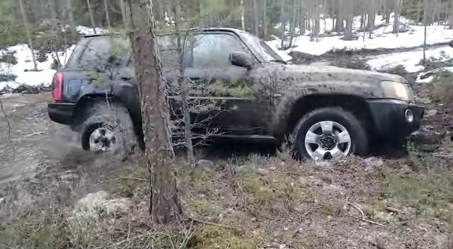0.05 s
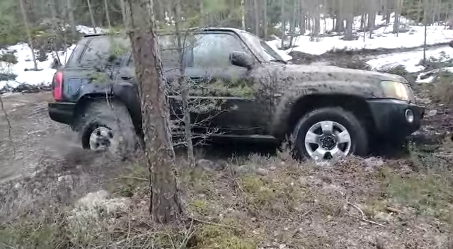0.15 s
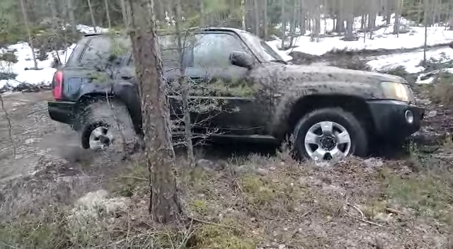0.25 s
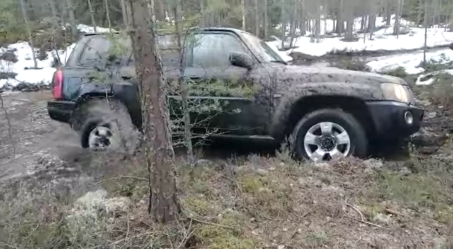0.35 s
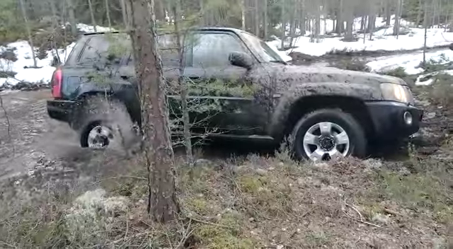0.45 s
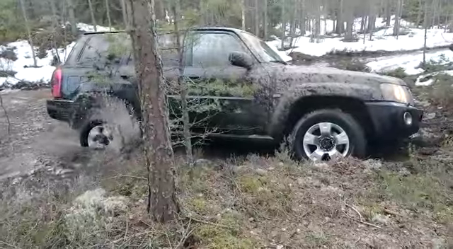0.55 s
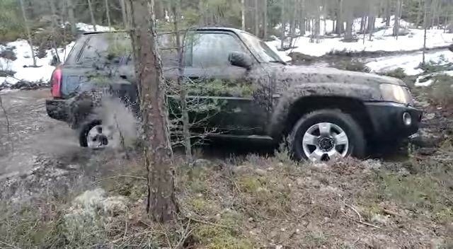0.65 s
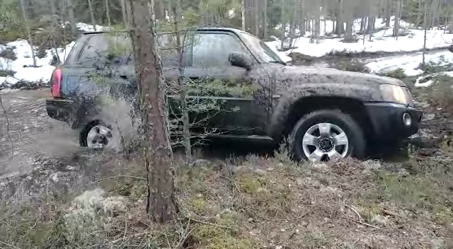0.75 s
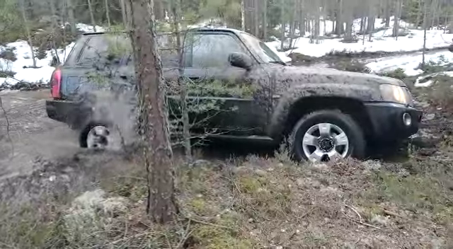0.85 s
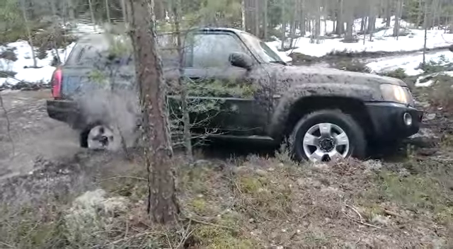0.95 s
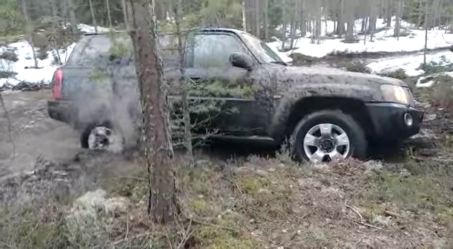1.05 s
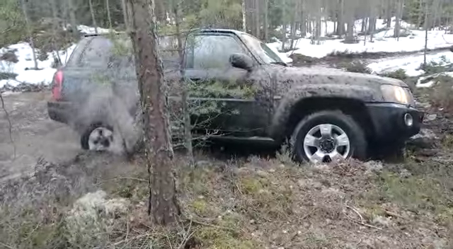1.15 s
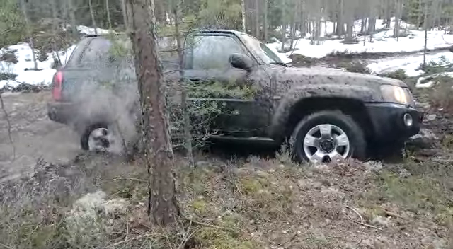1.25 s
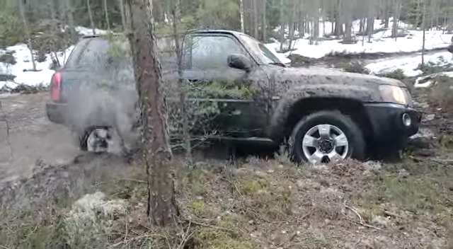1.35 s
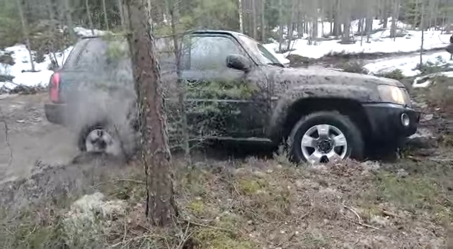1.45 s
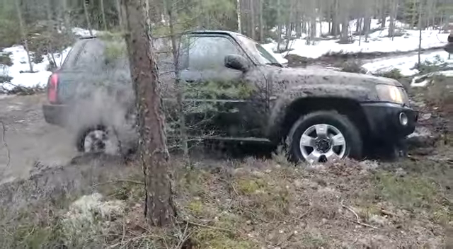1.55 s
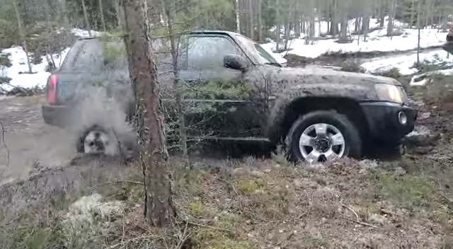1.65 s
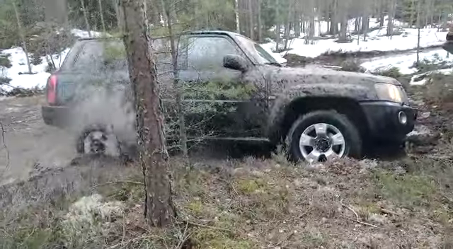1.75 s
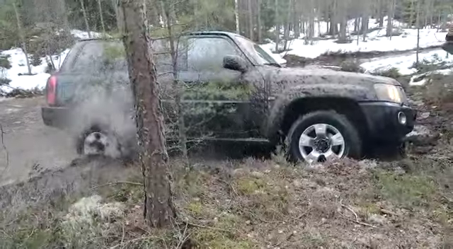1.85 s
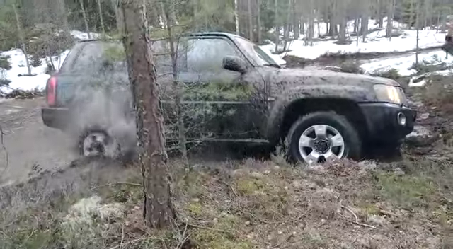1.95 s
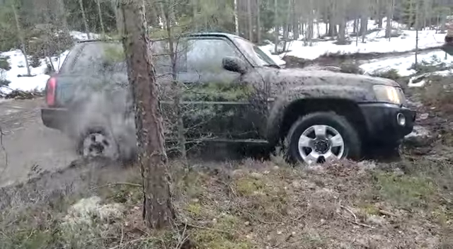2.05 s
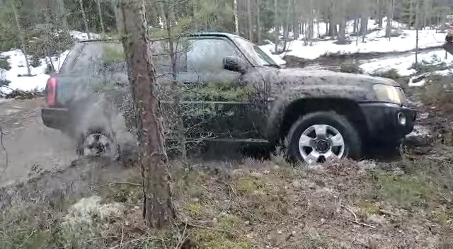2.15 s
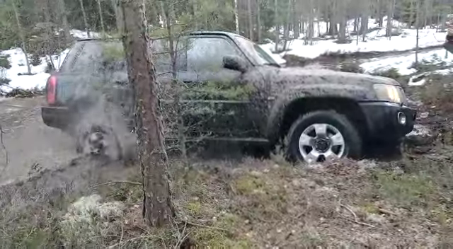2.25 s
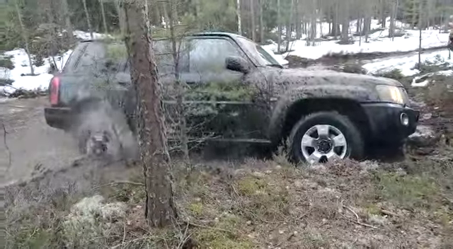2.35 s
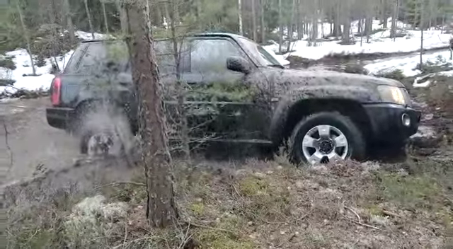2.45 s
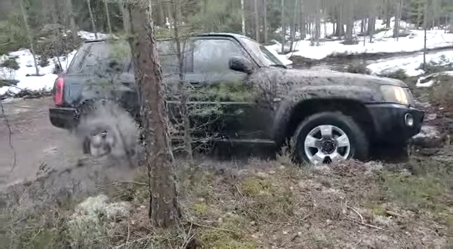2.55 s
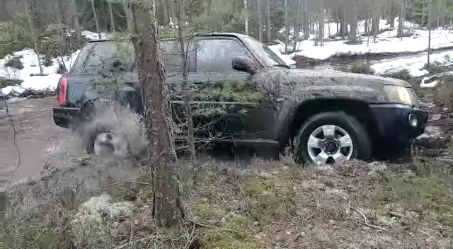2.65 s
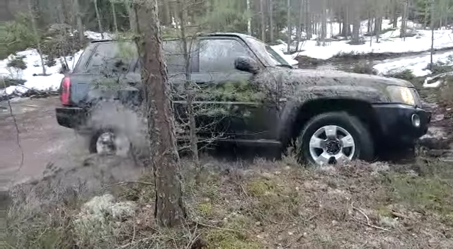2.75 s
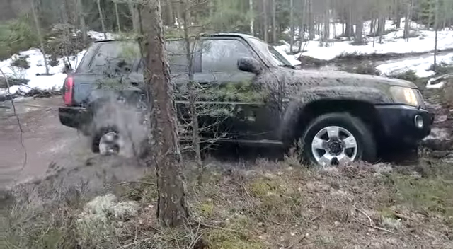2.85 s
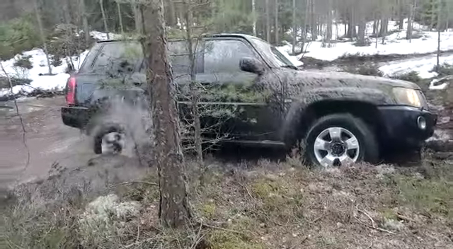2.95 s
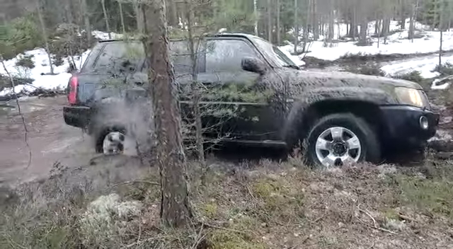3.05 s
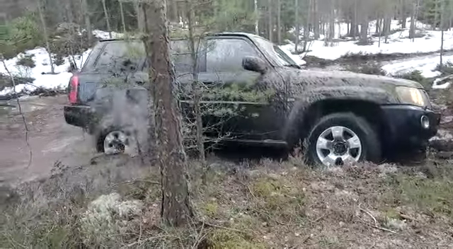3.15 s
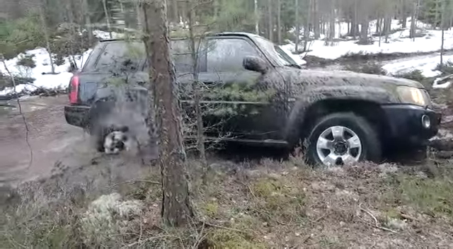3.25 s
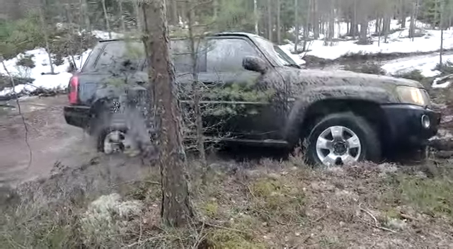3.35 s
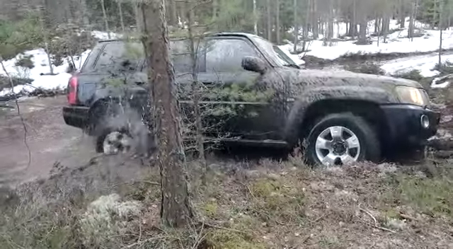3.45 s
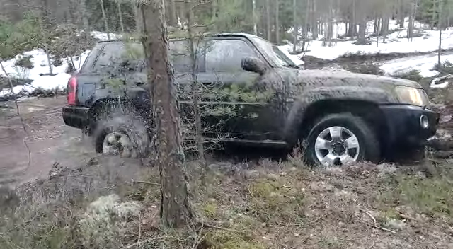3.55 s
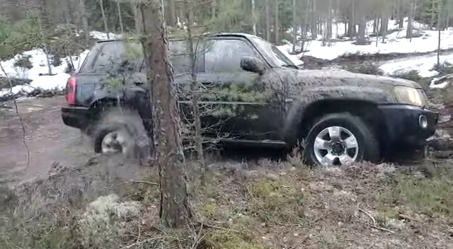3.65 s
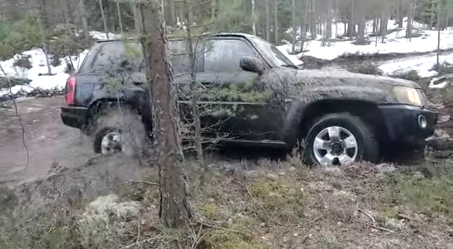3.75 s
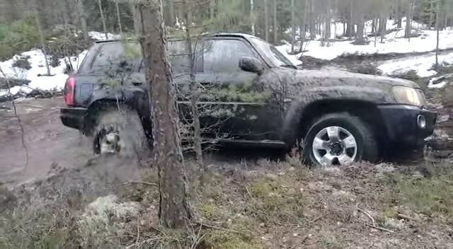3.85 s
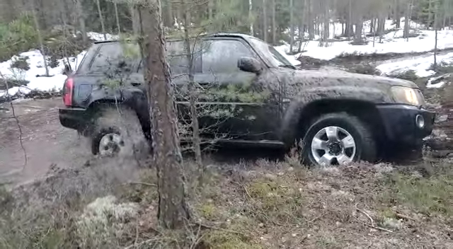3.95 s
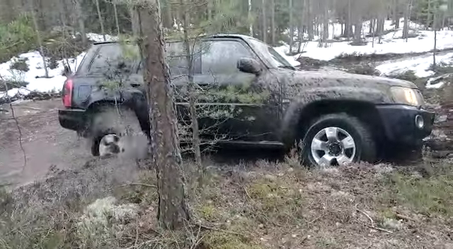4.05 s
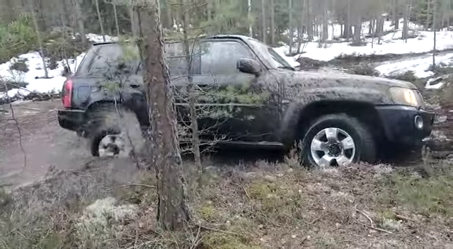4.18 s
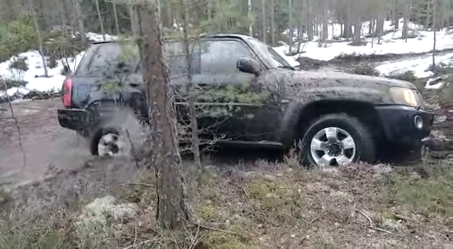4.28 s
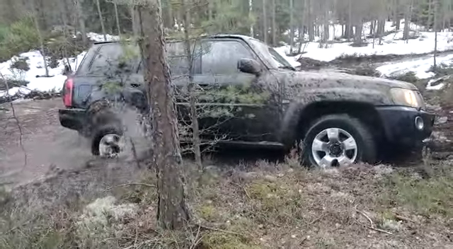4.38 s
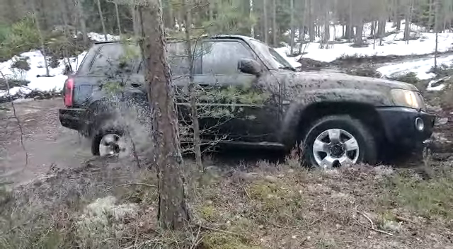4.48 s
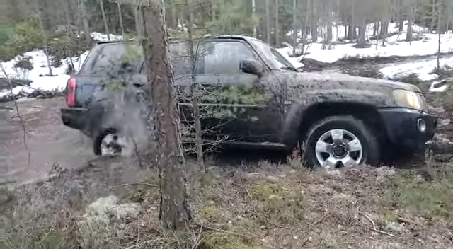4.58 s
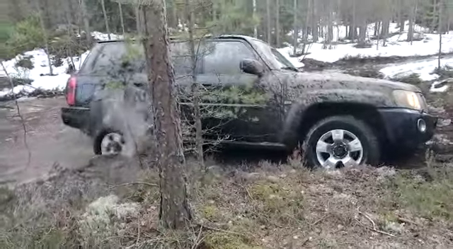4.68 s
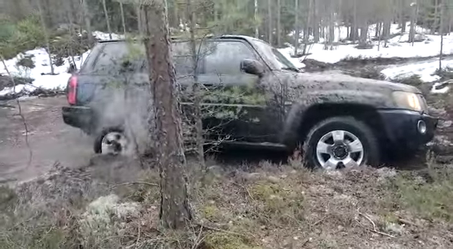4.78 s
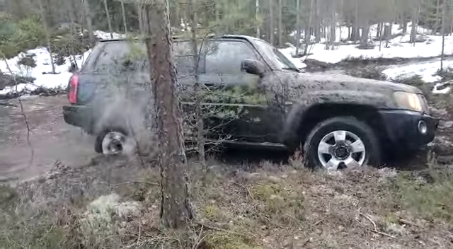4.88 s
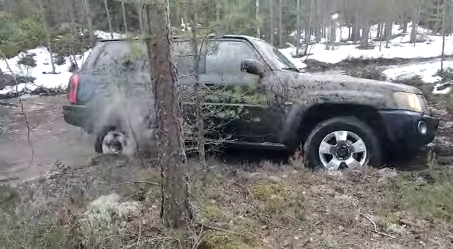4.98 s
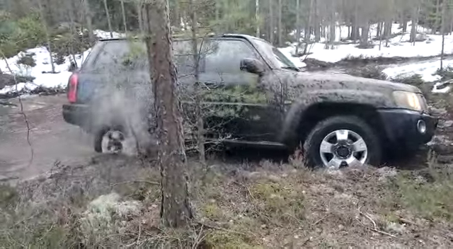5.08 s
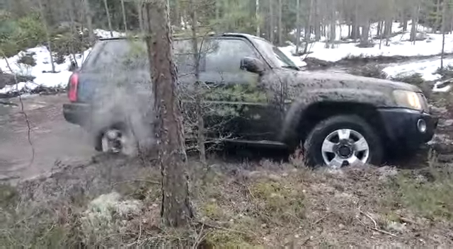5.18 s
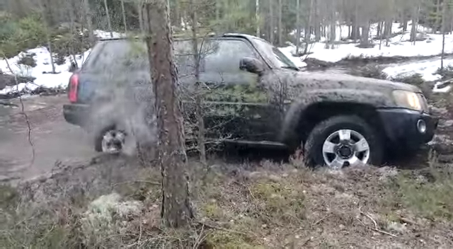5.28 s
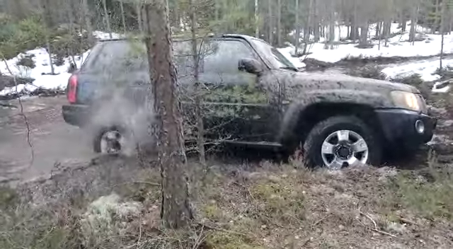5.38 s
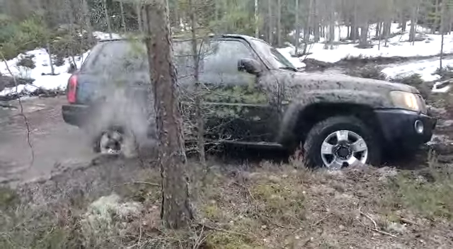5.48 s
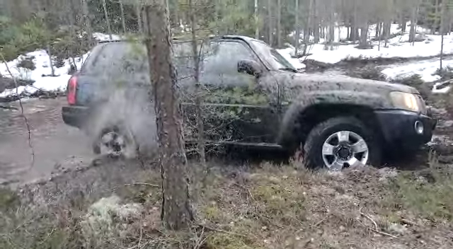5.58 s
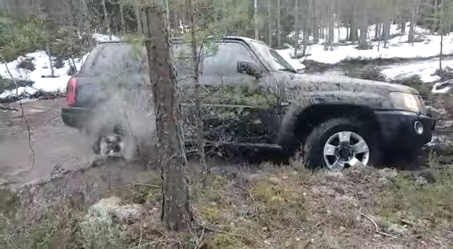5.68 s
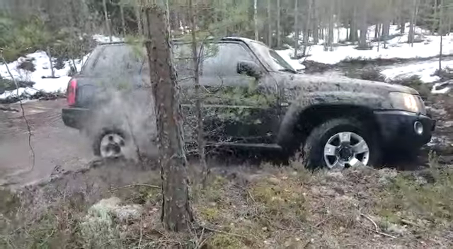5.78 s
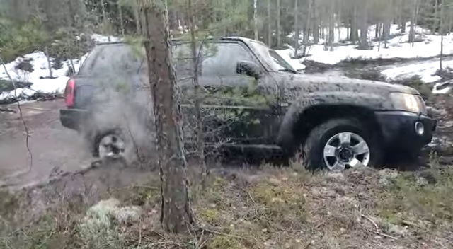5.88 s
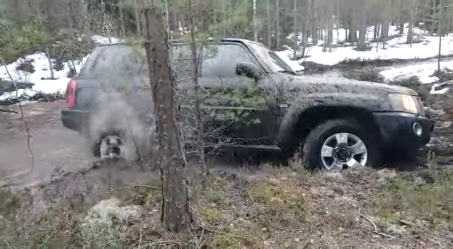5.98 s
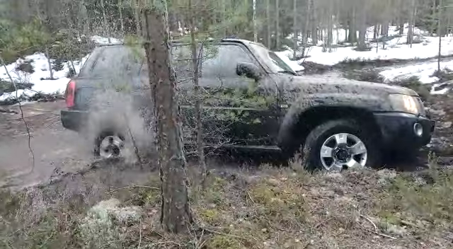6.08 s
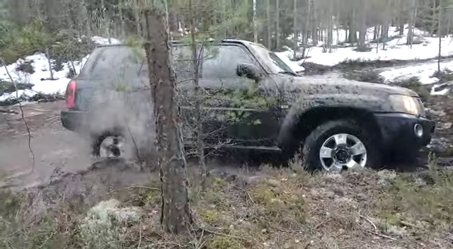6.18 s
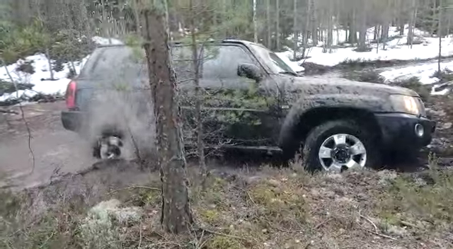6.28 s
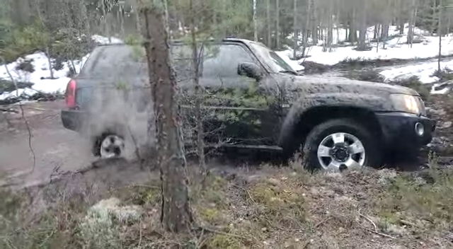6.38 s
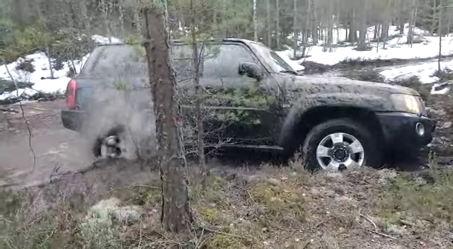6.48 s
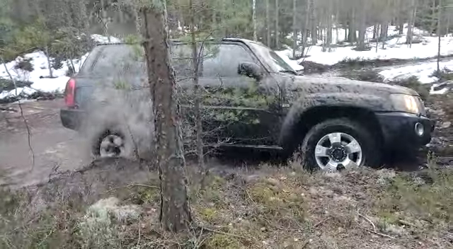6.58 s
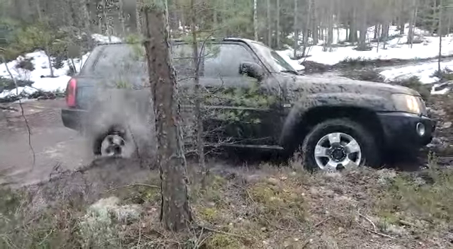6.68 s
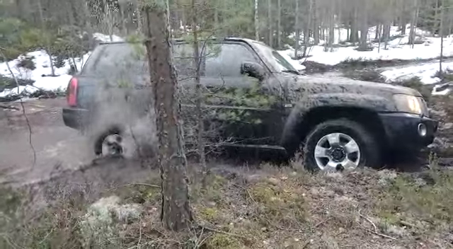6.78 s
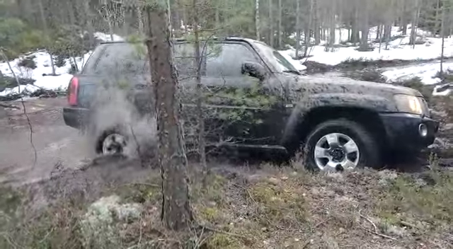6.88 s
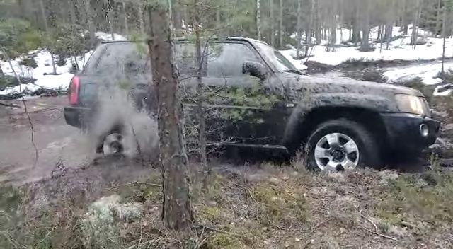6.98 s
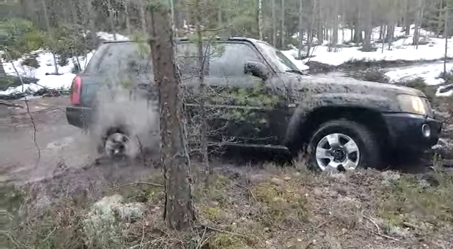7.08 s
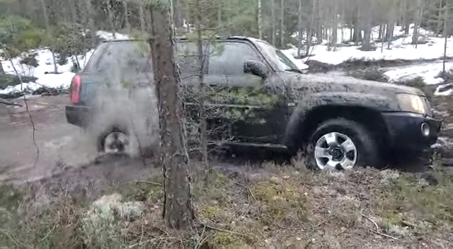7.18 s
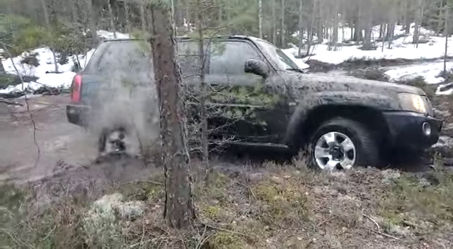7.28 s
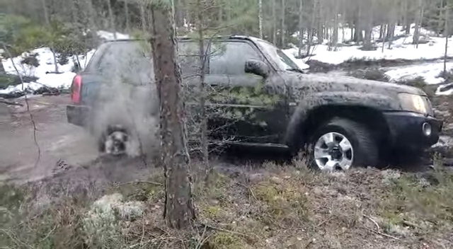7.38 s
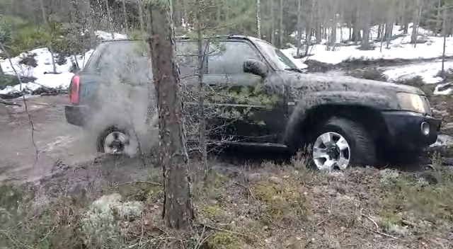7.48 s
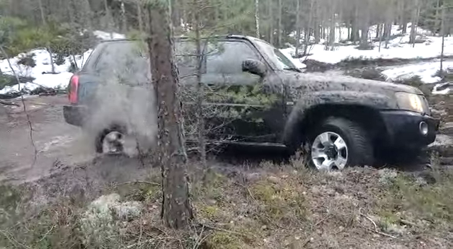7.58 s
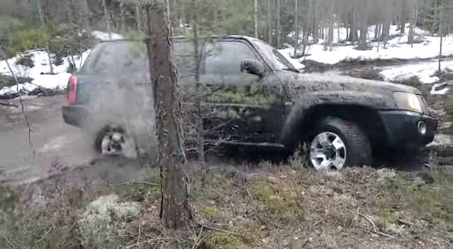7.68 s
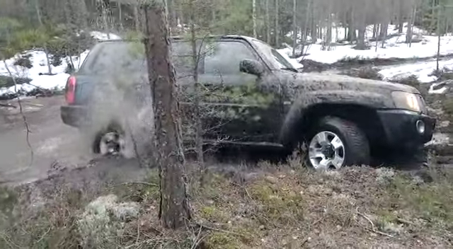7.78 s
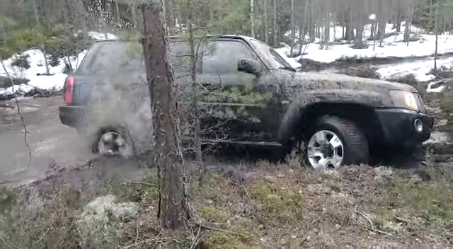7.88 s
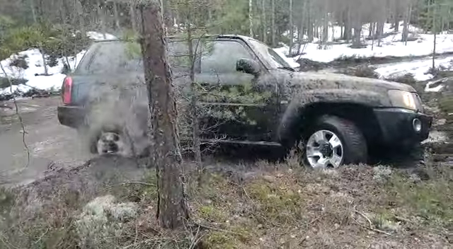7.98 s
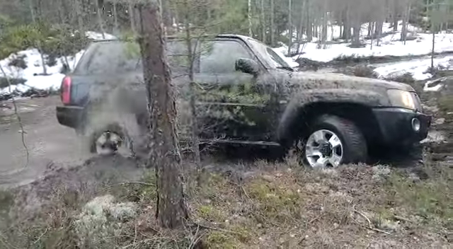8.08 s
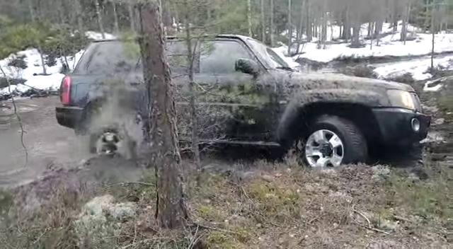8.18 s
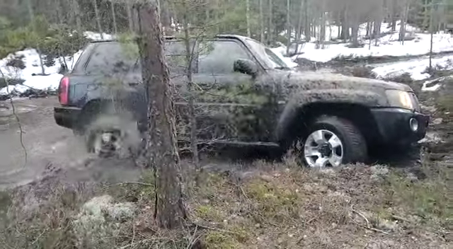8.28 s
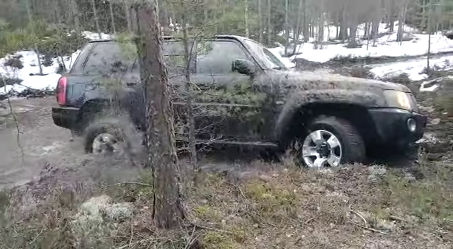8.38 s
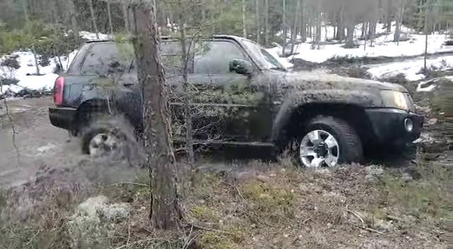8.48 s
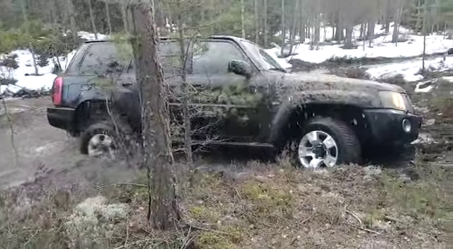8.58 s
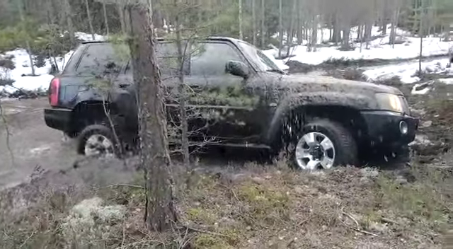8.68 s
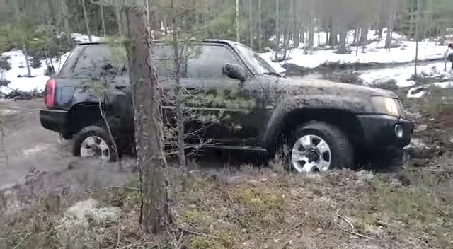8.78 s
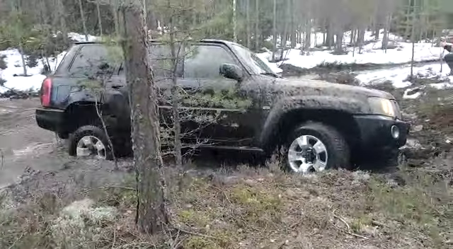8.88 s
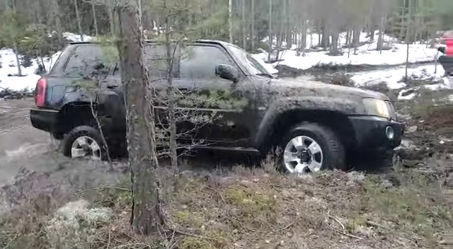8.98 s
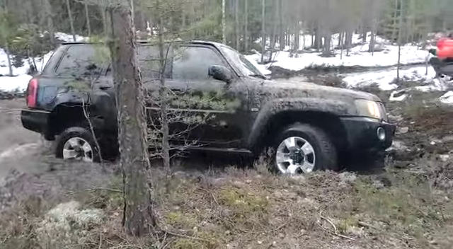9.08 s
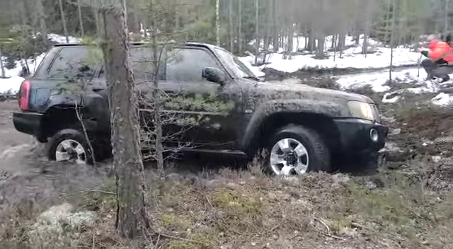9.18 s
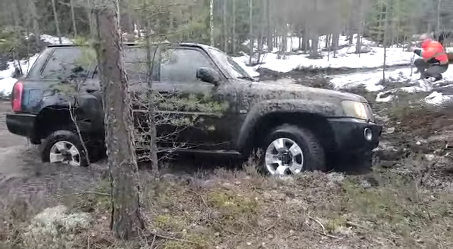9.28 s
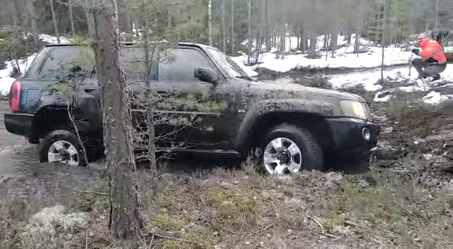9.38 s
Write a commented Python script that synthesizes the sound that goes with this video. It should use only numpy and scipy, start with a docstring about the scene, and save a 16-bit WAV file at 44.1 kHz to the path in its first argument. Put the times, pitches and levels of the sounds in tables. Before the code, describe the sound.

A heavy diesel engine is already revving and rises into a full, rough roar; broad wet hiss from a spinning wheel swells with it. The sound dips, rises briefly, dips lower, then builds into a long sustained surge with gear whine and muddy splatter. Near the end it falls quickly, leaving soft idle clatter, lumps of mud ticking and a small falling whine. Open-air, mono, with dull treble limit and quiet low background.

```python
"""A four-cylinder diesel off-roader, stuck in mud, revs in long surges and drops to idle, heard by one microphone.
Engine: random firing puffs and noise through a pipe spectrum, crank-multiple sines, clatter noise, decaying thuds.
A faster geared shaft sings in sines near full speed; a spinning tyre roars, hisses and throws mud and water in
patchy noise and sharp drops. A thin sine whines twice; below lie rumble, hum and wind. The end leaves idle clatter,
a short whine and sharp ticks in noise bursts: mud lumps at first, then ticks of the idling engine."""
import sys
import numpy as np
from scipy import signal
from scipy.fft import rfft, irfft, next_fast_len
from scipy.io import wavfile
from scipy.ndimage import uniform_filter1d, map_coordinates

SR = 44100
rng = np.random.default_rng(int(sys.argv[2]) if len(sys.argv) > 2 else 0)


def log_audio(samples):
    """Write samples as a 16-bit WAV file to the path given in sys.argv[1]."""
    # one column per channel
    frames = np.atleast_2d(samples).T
    # limit to full scale, then quantise
    limited = np.clip(frames, -1, 1)
    pcm = np.round(limited * 32767).astype(np.int16)
    wavfile.write(sys.argv[1], SR, pcm)


N = 416304
TIME = np.arange(N) / SR


def amp(db):
    """Amplitude factor of a level in dB."""
    return 10 ** (np.asarray(db) / 20)


def unit(x):
    """x scaled to rms 1."""
    return x / np.sqrt(np.mean(x ** 2) + 1e-20)


def curves(rows):
    """One value per sample for each column after the time."""
    t_s, *columns = np.transpose(rows)
    return [np.interp(TIME, t_s, column) for column in columns]


def along(points, hz):
    """(f/Hz, level/dB) points read on a log frequency axis."""
    f_hz, level_db = np.transpose(points)
    return np.interp(np.log(hz + 1), np.log(f_hz + 1), level_db)


def wobble(rate_hz):
    """Smooth random curve, rate_hz knots per second."""
    knots = rng.standard_normal(int(N * rate_hz / SR) + 4)
    return map_coordinates(knots, [TIME * rate_hz])


def filtered(x, response):
    """x times a response of frequency, zero-padded against wrap-around."""
    m = next_fast_len(N + SR // 2)
    spectrum = rfft(x, m) * response(np.fft.rfftfreq(m, 1 / SR))
    return irfft(spectrum, m)[..., :N]


def coloured(x, points):
    """x through a (f/Hz, level/dB) spectrum, at rms 1."""
    return unit(filtered(x, lambda hz: amp(along(points, hz))))


def patchy(patchy_db):
    """Noise with time-frequency patches of random gain, patchy_db rms; 0 leaves it even."""
    z = signal.stft(rng.standard_normal(N), nperseg=512)[2]
    field = uniform_filter1d(rng.standard_normal(z.shape), 6, 0)
    field = uniform_filter1d(field, 8, 1)
    return signal.istft(z * amp(patchy_db * unit(field)), nperseg=512)[1][:N]


def drops():
    """Dense sharp impacts of uneven size, at rms 1."""
    hit = rng.random(N) < .02
    return unit(hit * amp(3 * rng.standard_normal(N)) * rng.standard_normal(N))


def tone(turns, waver_db, drift_rad):
    """Sine on a running count of turns, rms 1 before its random waver in level; its phase drifts."""
    level = np.sqrt(2) * amp(waver_db * wobble(7))
    return level * np.sin(2 * np.pi * (turns + rng.random()) + drift_rad * wobble(9))


def fade(rows, edge_s):
    """1 inside the time span of a table, with linear ramps at its ends."""
    return np.clip(np.minimum(TIME - rows[0][0], rows[-1][0] - TIME) / edge_s, 0, 1)


# crank speed: t/s, speed/(turns/s)
REVS = [(0, 30), (0.5, 38), (1.18, 46.5), (1.85, 45.6), (2.02, 42.6), (2.36, 38.8), (2.68, 38.2),
        (2.95, 41.3), (3.1, 39.5), (3.36, 27.5), (3.52, 26), (4.29, 36.6), (4.68, 42.7), (5.05, 45.8),
        (5.3, 44.7), (6.25, 46.8), (6.54, 46.4), (6.8, 44), (7.07, 45.9), (7.7, 45.8), (7.97, 41.7),
        (8.44, 24.4), (8.82, 13), (9.0, 12.3)]
# engine: t/s, exhaust level/dB, 7th crank multiple level/dB
ENGINE = [(0, -20, -24.5), (.5, -19.5, -26), (.9, -18, -28.5), (1.3, -16.5, -29.5), (1.8, -17.5, -33.5),
          (2.05, -18, -22.5), (2.35, -23, -24), (2.7, -19.5, -37), (2.95, -17.5, -26.5), (3.45, -22.5, -50),
          (3.9, -21, -30.5), (4.3, -18, -28), (4.9, -18, -27), (5.5, -17, -34), (6, -16, -28),
          (6.6, -18, -36.5), (7.75, -17, -33), (8.15, -21.5, -31), (8.45, -28, -37.5), (8.7, -36, -46)]
# exhaust boom at high, then low speed: f/Hz, relative density/dB
PIPE_FAST = [(29, -54.5), (50, -26), (82, -11), (149, -7), (172, -1), (227, 2.5), (291, 0), (324, -6),
             (356, -4), (388, -7.5), (497, -20.5), (650, -28.5), (840, -39.5), (1430, -120)]
PIPE_SLOW = [(38, -46), (65, -20), (76, -21), (152, 1), (325, -10.5), (390, -19), (460, -23.5), (650, -41),
             (840, -54.5), (1430, -120)]
# faint crank multiples: multiple, level/dB re exhaust, before the high-speed pipe
CRANK = [(2.5, -19), (3.5, -19), (5, -17), (6, -19), (8, -15)]
# clear crank multiples: multiple, level/dB re exhaust at full speed, loss below it/(dB per turn/s)
CLEAR = [(2, -19, -.1), (3, -13, .7), (4, -9, .1)]
KNOCK_SPECTRUM = [(1800, -37), (2700, -7.0), (3300, 0.5), (4200, -6.5), (5300, -1.0), (6200, -66.5)]  # f/Hz, dB
FULL_SPEED_TPS, FIRING_S = 46, 9.342  # crank turns/s; one firing falls at this time


def engine():
    """Two firings a turn: uneven puffs and turbulent gas in the pipe, crank orders, combustion clatter."""
    speed_tps, = curves(REVS)
    exhaust_db, seventh_db = curves(ENGINE)
    turns = np.cumsum(speed_tps) / SR
    turns = turns - turns[round(FIRING_S * SR)]
    fired = np.flatnonzero(np.diff(np.floor(2 * turns)))
    puffs = np.zeros(N)
    # random size and sign; the root keeps the power even as the firing rate changes
    puffs[fired] = rng.normal(0, 1, len(fired)) * np.sqrt(SR / speed_tps[fired] / 2)
    beat = (1 + np.cos(4 * np.pi * turns)) / 2  # peaks at each firing
    gas = 0.26 * puffs + patchy(patchy_db=0.8) * (1 - .3 * beat)

    fast = np.clip((speed_tps - 26) / 19, 0, 1)  # boom brightens with speed
    boom = amp(-1.5) * (fast * coloured(gas, PIPE_FAST) + (1 - fast) * coloured(gas, PIPE_SLOW))

    faint = sum(amp(db + along(PIPE_FAST, k * speed_tps)) * tone(k * turns, waver_db=4.0, drift_rad=0.81)
                for k, db in CRANK)
    below_tps = FULL_SPEED_TPS - speed_tps
    clear = sum(amp(db - loss_db * below_tps) * tone(k * turns, waver_db=2.2, drift_rad=.3)
                for k, db, loss_db in CLEAR)
    seventh = amp(seventh_db) * tone(7 * turns, waver_db=1.4, drift_rad=.3)

    knock = coloured(rng.standard_normal(N) * beat ** 3 * amp(1.9 * wobble(18)), KNOCK_SPECTRUM)
    clatter = amp(-40 + 0.22 * (exhaust_db + 33.5)) * knock  # grows slowly with exhaust level
    exhaust = amp(exhaust_db + 0.55 * wobble(12)) * boom
    return exhaust + amp(exhaust_db) * (faint + clear) + seventh + clatter


# heavy firings: t/s, level/dB before attack and decay, f/Hz
THUDS = [(0.476, -0.5, 200), (1.361, -8.5, 268), (1.43, -3, 224), (2.054, -8.5, 186), (2.69, 1, 206),
         (4.58, -3.5, 252), (4.966, -2.5, 183), (5.146, -9, 196), (7.278, -5, 221), (7.443, -15, 217),
         (7.808, -8, 176), (7.966, -9, 232), (8, 0.5, 237), (8.144, -6, 165), (8.164, -5.5, 181),
         (8.447, -11.5, 150), (8.481, -11, 120), (8.538, -16, 80)]


def thuds():
    """Heavy firings give the pipe a short knock: a sine decaying within a few cycles."""
    out, t = np.zeros(N + SR), np.arange(SR // 20) / SR
    for t_s, level_db, f_hz in THUDS:
        envelope = amp(level_db - 60 * t / 0.044) * (1 - np.exp(-t / .003))
        out[round(t_s * SR):][:len(t)] += envelope * np.sin(2 * np.pi * f_hz * t)
    return out[:N]


# two spans of geared shaft song: t/s, speed/(turns/s)
SHAFT = [
    [(0.85, 50), (1.05, 53), (1.2, 55), (1.9, 52)],
    [(4.8, 53.5), (5, 55.3), (5.32, 52), (5.55, 55.2), (5.85, 54.6), (6.05, 55.3), (6.5, 55.2),
     (6.85, 50.5), (7.06, 55.4), (7.7, 55.2), (7.85, 53)],
]
# further low multiples: multiple, level/dB re 7th
MESH = [(2, -6.5), (4, -4), (6, 1.5)]
# gear-tooth multiples: multiple, level/dB re tooth level
TEETH = [(16, -1), (30, 0.5), (40, -3.5)]
# gear-tooth level: t/s, level/dB
TEETH_LEVEL = [(0.85, -52), (1.5, -43), (1.9, -52), (4.8, -41), (5.2, -45), (5.43, -32), (5.6, -38),
               (6.45, -36), (6.7, -48), (7.05, -39), (7.3, -48)]
# 7th multiple at top speed; shaft turns/s; loss in dB per turn/s below top
SONG_DB, SHAFT_TOP_TPS, SONG_FALL_DB = -30, 55.4, 1.5


def shaft():
    """Geared shaft sounds multiples of its speed: low ones rise with speed, tooth tones follow their own level."""
    out = np.zeros(N)
    for rows in SHAFT:
        speed_tps, = curves(rows)
        turns = np.cumsum(speed_tps) / SR
        seventh_db = SONG_DB - SONG_FALL_DB * (SHAFT_TOP_TPS - speed_tps)
        teeth_db, = curves(TEETH_LEVEL)
        low = amp(seventh_db) * tone(7 * turns, waver_db=1.8, drift_rad=.4)
        low = low + sum(amp(seventh_db + db) * tone(k * turns, waver_db=2, drift_rad=1.0) for k, db in MESH)
        teeth = sum(amp(teeth_db + db) * tone(k * turns, waver_db=2.4, drift_rad=.5) for k, db in TEETH)
        out += fade(rows, edge_s=0.081) * (low + teeth)
    return out


# tyre: t/s, churn level/dB, splash level/dB
TYRE = [(0, -30.5, -28), (.3, -29, -26.5), (.9, -25.5, -23.5), (1.2, -24, -22.5), (1.8, -25.5, -24),
        (2.1, -29, -26.5), (2.35, -30, -27), (2.9, -27.5, -25.5), (3.3, -31.5, -29), (3.65, -32, -28),
        (4.15, -28, -26.5), (4.85, -25, -23.5), (5.2, -26, -24.5), (5.7, -25, -22.5), (6.45, -25.5, -23.5),
        (6.65, -27.5, -25.5), (7.15, -25, -23.5), (7.7, -26, -24.5), (8.2, -31.5, -27.5), (8.43, -34, -27),
        (8.56, -35.5, -30.5), (8.9, -35.5, -30), (9.12, -39, -38.5), (9.44, -39, -40.5)]
# mud under the tread: f/Hz, relative density/dB
CHURN = [(250, -24.5), (420, -1.5), (495, -9.5), (574, -9.5), (874, -5), (1070, -7), (1370, -11),
         (1610, -10), (1900, -12), (2300, -13.5), (2990, -29.5), (5060, -120)]
# thrown water: f/Hz, relative density/dB
SPRAY = [(1060, -33.5), (1800, -13), (1910, -10), (2450, -0.5), (2930, 0.5), (3320, 3.5), (3760, -6),
         (4300, -7.5), (5590, -25), (9460, -120)]
# water raining on the bodywork: f/Hz, relative density/dB
SPLASH = [(2180, -31), (3700, -4.5), (5210, 2.5), (5450, -0.5), (6060, -17.5), (6400, -21), (8320, -72),
          (14100, -120)]
# finest spray: f/Hz, relative density/dB
MIST = [(3470, -23), (5900, 6), (6320, -0.5), (7280, 7), (7660, 6.5), (8390, -19), (8520, -68.5),
        (8700, -49), (11300, -83), (19100, -120)]
# mist settling: t/s, level offset/dB
MIST_SETTLES = [(8.9, -0.5), (9.05, -4), (9.44, -6)]
# wheel-arch resonances: f/Hz, width/Hz, level/dB before the summed response is squared
ARCH = [(2080, 70, -10), (2170, 79, -4), (2510, 190, 0.5)]
# wheel-arch ringing in the last surge: t/s, level/dB
SURGE = [(6.9, -54), (7.1, -33.5), (7.4, -29.5), (7.75, -29), (7.95, -57)]
FULL_DB = -25  # churn and splash near full spin
SPRAY_DB, SPRAY_GROWS = -24.5, 1.16  # dB at FULL_DB churn; dB per dB of churn
MIST_DB, MIST_GROWS = -37.5, .5  # dB at FULL_DB splash, before settling; dB per dB of splash


def arch_response(f_hz):
    """Summed wheel-arch resonances, squared for steeper skirts."""
    total = sum(amp(db) * f_hz * w / np.abs(c * c - f_hz * f_hz + 1j * f_hz * w) for c, w, db in ARCH)
    return total ** 2


def tyre():
    """Tread churns mud and throws water: noise with sharper drops scattered in it; the wheel arch rings."""
    churn_db, splash_db = curves(TYRE)
    spray_db = SPRAY_DB + SPRAY_GROWS * (churn_db - FULL_DB)
    mist_db = MIST_DB + MIST_GROWS * (splash_db - FULL_DB) + curves(MIST_SETTLES)[0] + 0.68 * wobble(20)
    slosh = wobble(14) + wobble(33)
    impacts = drops()  # shared by spray and splash
    churn = amp(churn_db + 0.2 * slosh) * coloured(patchy(patchy_db=0.74), CHURN)
    spray = amp(spray_db + 0.17 * slosh) * coloured(patchy(patchy_db=0.14) + .2 * impacts, SPRAY)
    splash = amp(splash_db + 0.3 * slosh) * coloured(patchy(patchy_db=0.24) + 0.4 * impacts, SPLASH)
    mist = amp(mist_db + 0.14 * slosh) * coloured(patchy(patchy_db=0.0) + 0.44 * drops(), MIST)
    ringing = unit(filtered(rng.standard_normal(N), arch_response))
    ringing = fade(SURGE, edge_s=0.048) * amp(curves(SURGE)[0]) * ringing
    return churn + spray + splash + mist + ringing


# sharp ticks, mud lumps at first, then the idling engine: t/s, peak level/dB before the treble cut, f/Hz
TICKS = [(8.307, -13.5, 4660), (8.4476, -12, 5400), (8.7103, -19, 5230), (8.8458, -13, 4870),
         (9.0007, -12, 5350), (9.2694, -20, 5300), (9.342, -20, 3520), (9.3751, -22, 5200)]


def ticks():
    """Sharp ticks, mud lumps at first, then the idling engine: short noise cracks, each in a band at its pitch."""
    out, t = np.zeros(N + SR), np.arange(SR // 40) / SR
    for t_s, peak_db, f_hz in TICKS:
        edges_hz = [f_hz / 1.3, min(f_hz * 1.15, 5700)]
        band = signal.butter(N=2, Wn=edges_hz, btype="band", fs=SR, output="sos")
        envelope = amp(-60 * t / .009) * (1 - np.exp(-t / .0003))
        crack = signal.sosfilt(band, rng.standard_normal(len(t)) * envelope)
        out[round(t_s * SR):][:len(t)] += amp(peak_db) * crack / np.abs(crack).max()
    return filtered(out[:N], lambda hz: amp(along([(5600, 0), (6300, -18), (8500, -40)], hz)))


# two whines: t/s, f/Hz, level/dB
WHINE = [
    [(3.95, 400, -40), (4.1, 445, -37), (4.22, 485, -37), (4.28, 480, -42)],
    [(8.77, 365, -40), (8.85, 395, -38), (8.9, 424, -41), (9.05, 416, -42), (9.18, 365, -44),
     (9.25, 355, -42), (9.32, 345, -47)],
]


def whine():
    """A thin sine rises and sinks in pitch."""
    out = np.zeros(N)
    for rows in WHINE:
        f_hz, level_db = curves(rows)
        out += fade(rows, edge_s=.04) * amp(level_db) * tone(np.cumsum(f_hz) / SR, waver_db=1.5, drift_rad=.4)
    return out


# low surrounding rumble: f/Hz, relative density/dB
FOREST = [(35, -31), (60, -2), (86, -1), (172, -4.5), (307, -2.5), (363, -3.5), (500, -16.5), (650, -45.5),
          (1100, -120)]
# hum: f/Hz, level/dB
HUM = [(88, -46.5), (176, -52)]


def forest():
    """Low surrounding rumble of patchy noise, with two hum sines in it."""
    hum = sum(amp(db) * tone(hz * TIME, waver_db=1, drift_rad=0.55) for hz, db in HUM)
    return amp(-37.5) * coloured(patchy(patchy_db=2.5), FOREST) + hum


# air moving past the microphone: t/s, level/dB
WIND = [(0, -46.5), (2.5, -53), (3.8, -43.5), (5.5, -50.5), (6.8, -45), (9.44, -50.5)]
WIND_SPECTRUM = [(10, -30.5), (22, -1), (45, 0), (70, -8.5), (140, -64)]  # f/Hz, relative density/dB


def wind():
    """Light buffeting of air at the microphone: slowly varying deep-bass noise."""
    level_db = curves(WIND)[0] + 2.5 * wobble(1.5)
    return amp(level_db) * coloured(patchy(patchy_db=3), WIND_SPECTRUM)


def scene():
    """One microphone feeds both channels."""
    vehicle = engine() + thuds() + shaft() + tyre() + ticks() + whine()
    return np.tile(vehicle + forest() + wind(), (2, 1))


TOP_HZ = 8750


def record(dry):
    """Input stage rounds off the highest peaks, then keeps nothing from TOP_HZ up."""
    soft = dry / (1 + np.abs(dry / .88) ** 6) ** (1 / 6)
    return filtered(soft, lambda hz: hz < TOP_HZ)


dry = scene()
out = record(dry)
log_audio(out)
```